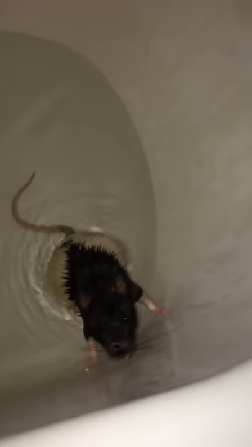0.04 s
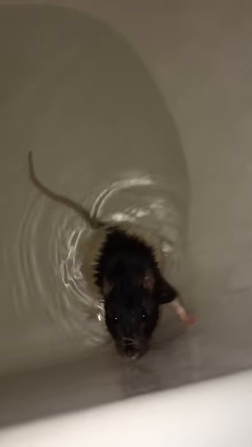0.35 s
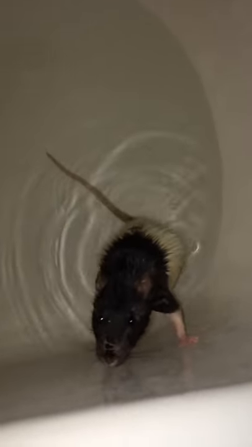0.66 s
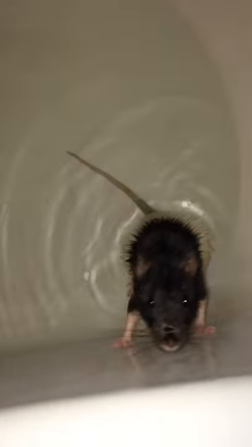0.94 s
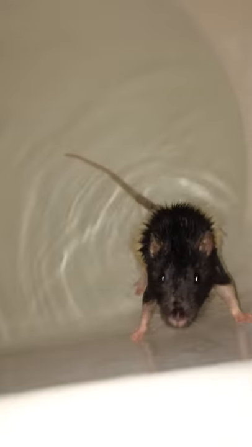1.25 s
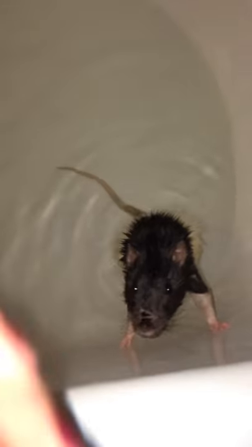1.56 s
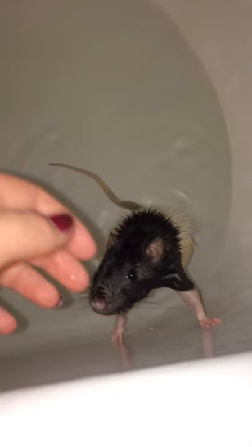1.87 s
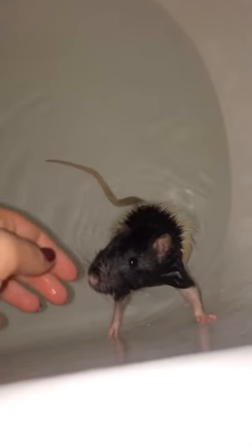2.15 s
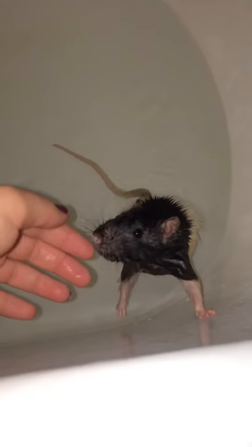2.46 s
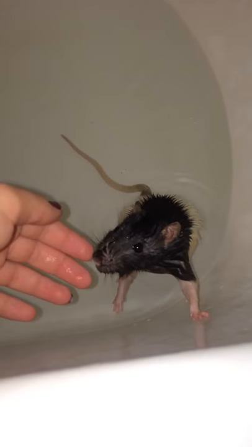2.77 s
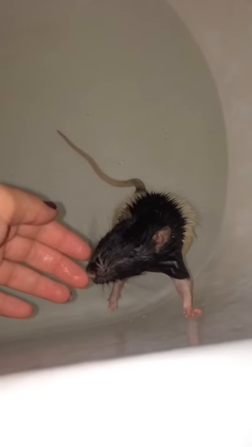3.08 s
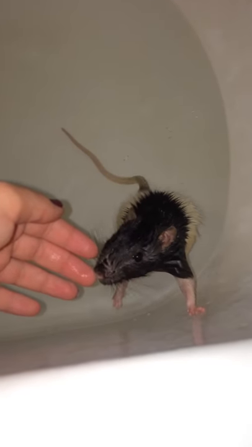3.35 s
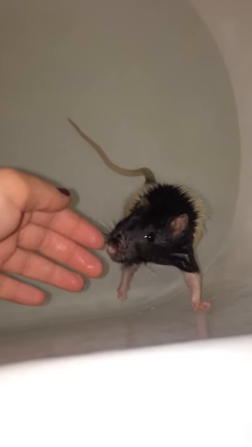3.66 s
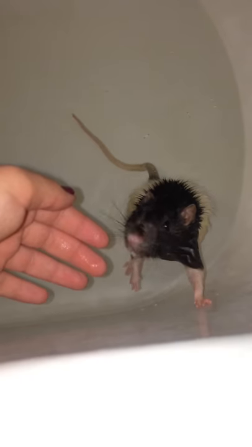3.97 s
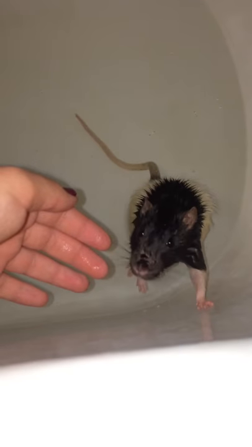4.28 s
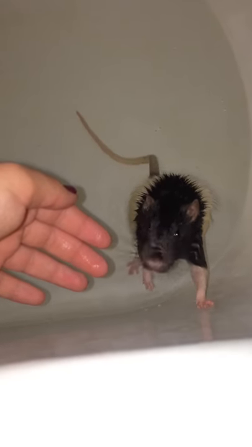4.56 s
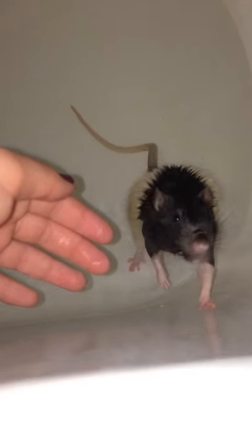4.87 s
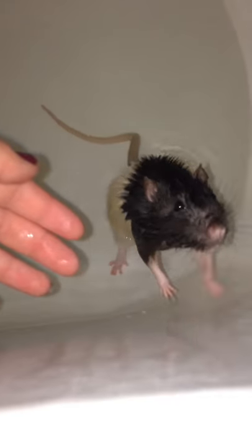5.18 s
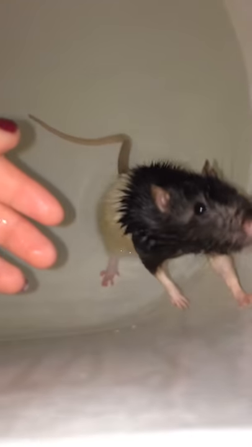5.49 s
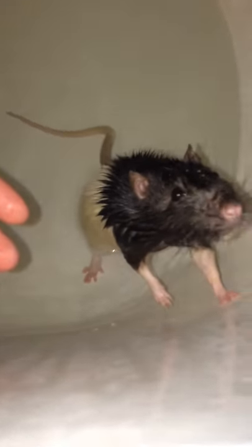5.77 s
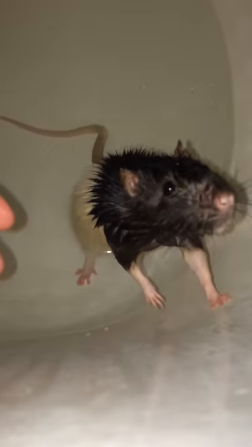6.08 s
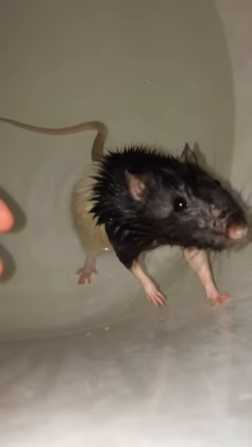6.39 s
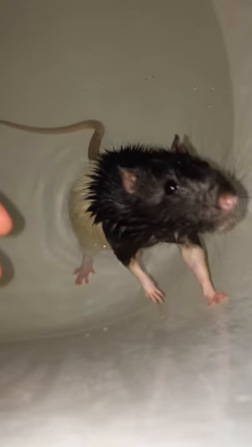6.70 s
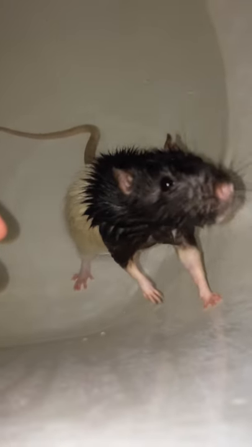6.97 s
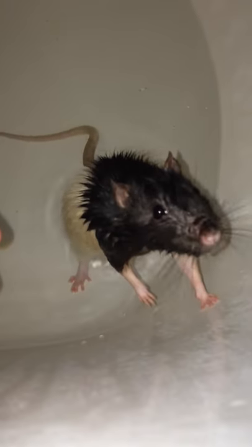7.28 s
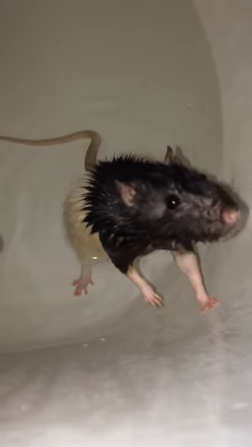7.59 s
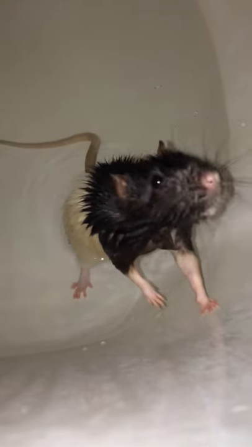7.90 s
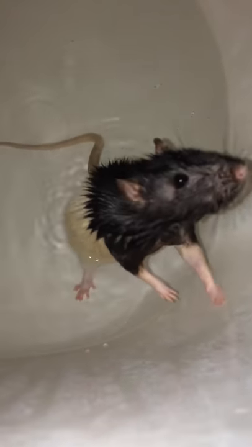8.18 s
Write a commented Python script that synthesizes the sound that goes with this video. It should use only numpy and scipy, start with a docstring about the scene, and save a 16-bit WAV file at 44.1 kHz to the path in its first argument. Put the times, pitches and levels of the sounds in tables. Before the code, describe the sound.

A small animal wades through shallow bath water, with light sloshes, drips and plops, and one bigger splash near the end.

```python
"""Small drips and light sloshing, close by: a rat wades in a shallow bath, then lunges once
and later makes one big splash. Its legs trap air that plops and gurgles, drops fall from its fur,
and fine spray crackles on the surface. The stirred water booms softly in the tub;
the tub walls and a small bathroom echo."""
import sys
import numpy as np
from scipy import signal
from scipy.fft import rfft, irfft, next_fast_len
from scipy.io import wavfile

SR = 44100
rng = np.random.default_rng(int(sys.argv[2]) if len(sys.argv) > 2 else 0)


def transcribe(u):
    """Save the signal u as a 16-bit wav file named by the first command-line argument.

    u: samples, shape (n,) or (channels, n), limited to [-1, 1]; the rate is SR.
    q: integer samples, one column per channel.
    """
    v = np.clip(np.atleast_2d(u).T, -1, 1)
    q = np.round(v * 32767).astype(np.int16)
    wavfile.write(sys.argv[1], SR, q)


N = 363384

# Spectra of still air, churn and spray. Each row: frequency in Hz, relative density in dB.
ROOM_TONE_SPECTRUM = [(15, -38.5), (30, -4.5), (85, -31.5), (200, -8), (500, -6.5), (1000, -30),
                      (1600, -50), (4000, -16), (15000, -27.5)]
CHURN_SPECTRUM = [(250, -18), (600, -12), (1000, -0.5), (1550, 4), (2200, 0.5), (3400, -3), (5000, -6),
                  (9000, -24)]
SPRAY_SPECTRUM = [(1500, -11), (3500, -8), (5000, -8.5), (7000, -7), (9000, -4.5), (12000, -4.5),
                  (15500, -1)]
# Bathroom reverberation. Each row: frequency in Hz, T60 in seconds.
ROOM_DECAY = [(150, 0.29), (600, 0.26), (1500, 0.22), (5000, 0.28), (14000, 0.27)]
# Resonances of the tub's shell, the hollow of air above the water, and the basin.
# Each row: frequency in Hz, bandwidth in Hz, relative gain in dB.
SHELL_MODES = [(91, 31, -0.5), (114, 25, -18.5), (142.6, 7.4, -2), (171, 7.6, -9)]
HOLLOW_MODES = [(288, 3.6, 5.4), (340.8, 16, 12), (408, 25, 3.7)]
BASIN_MODES = [(483, 2.8, 3.5), (532.3, 35.5, 10.5), (587, 10.6, 8.5), (658, 16, 4), (692, 53, 0.5)]
# Weight shifting against the tub. Each row: start in seconds, length in seconds, boom level in dB.
SHOVES = [(0.92, .2, -62), (1.46, 0.012, -61), (1.63, 0.15, -50.5), (1.79, 0.04, -43), (2.15, 0.4, -63),
          (2.55, 0.49, -62.5), (4.17, 0.79, -57.5), (4.93, 0.11, -61), (5.74, .1, -61),
          (6.24, 0.079, -44.5), (6.57, 0.52, -46), (7.1, 0.032, -52.5), (7.61, 0.26, -49.5),
          (7.95, .28, -61.5)]
# Moves of a leg or the body through the water.
# Each row: start in seconds, length in seconds, then slosh, hollow, churn and spray levels in dB.
STROKES = [(0.023, 0.017, -73, -65, -66, -52), (0.466, 0.031, -58.5, -60, -59.5, -48.5),
           (0.796, 0.047, -87, -77, -61.5, -55), (0.906, 0.035, -57.5, -58, -60, -63),
           (1.022, 0.11, -58, -51, -52, -48), (1.274, 0.042, -58.5, -55, -51, -49.5),
           (1.405, 0.087, -50, -47.5, -61.5, -59.5), (1.655, .14, -64, -61, -59.5, -57.5),
           (1.816, 0.06, -47, -45, -52.5, -72), (2.268, 0.083, -68, -70, -55, -54.5),
           (2.511, 0.054, -57, -52, -51.5, -62.5), (2.662, 0.033, -70.5, -66, -55.5, -61),
           (2.836, 0.094, -63.5, -70, -62, -68), (3.485, .005, -60, -58.5, -66, -75),
           (3.576, 0.21, -75, -79, -65.5, -62.5), (4.127, 0.24, -51.5, -56, -46.5, -49.5),
           (4.349, .07, -56, -56.5, -42.5, -49.5), (4.509, .1, -41.5, -52.5, -47, -52.5),
           (4.917, 0.12, -50.5, -49.5, -57, -59), (5.161, 0.25, -62.5, -64, -61.5, -59.5),
           (5.728, 0.038, -60.5, -58, -58.5, -66.5), (6.198, 0.072, -42, -48.5, -49, -101),
           (6.426, 0.14, -60, -57, -60, -58), (6.531, 0.15, -29.5, -36.5, -40.5, -69),
           (6.584, 0.01, -38, -45, -37.5, -43), (6.732, 0.076, -67, -73, -50, -62.5),
           (6.963, 0.13, -68, -69, -51, -55), (7.061, 0.16, -56.5, -65, -50.5, -51),
           (7.327, 0.31, -66, -63.5, -52.5, -55.5), (7.708, 0.1, -54, -52.5, -55.5, -75),
           (7.922, .03, -56.5, -55.5, -77, -89)]
# Drops and paws hitting the surface. Each row: start in seconds, relative level in dB, centre in Hz.
SLAPS = [(0.395, -39.5, 3880), (0.491, -37, 5030), (0.784, -39.5, 5000), (0.995, -38.5, 7760),
         (1.009, -37.5, 13200), (1.127, -33.5, 8700), (1.228, -41.5, 5540), (1.281, -33.5, 4400),
         (1.407, -36, 3470), (1.875, -43, 8000), (2.258, -55.5, 6300), (2.33, -49, 2370),
         (2.468, -48, 3970), (3.463, -48, 900), (3.714, -39.5, 2000), (4.097, -33.5, 3900),
         (4.142, -33, 1480), (4.264, -34.5, 4330), (4.323, -31, 690), (4.421, -28.5, 3060),
         (4.469, -28.5, 3160), (4.918, -38, 1310), (5.277, -47.5, 3600), (5.6277, -42.5, 6260),
         (5.865, -58, 7700), (5.978, -51, 4100), (6.081, -44.5, 4340), (6.081, -50.5, 12700),
         (6.1647, -37, 3150), (6.164, -32.5, 970), (6.983, -41.5, 4660), (7.065, -36.5, 4100),
         (7.088, -34, 4270), (7.177, -38, 4300), (7.344, -41, 1800), (7.6732, -40.5, 1050),
         (7.788, -43, 970)]
# Small bubbles left by drops from the fur. Each row: start in seconds, pitch in Hz, peak in dB.
DRIPS = [(0.0, 1270, -48), (0.0278, 913, -40.5), (0.059, 1864, -46), (0.219, 4330, -48.5),
         (0.3946, 3580, -33.5), (0.4952, 1704, -46), (0.647, 2220, -55.5), (1.0759, 1323, -36.5),
         (1.2389, 1874, -48.5), (1.4256, 3560, -43), (2.059, 2865, -47.5), (2.2761, 2030, -46.5),
         (2.3293, 1815, -38), (2.5628, 1480, -48), (2.8308, 1600, -50), (2.931, 1540, -48.5),
         (3.0882, 1240, -47.5), (3.205, 1860, -53), (3.283, 1350, -46.5), (3.338, 1504, -52.5),
         (3.714, 1440, -39.5), (3.83, 3960, -41.5), (3.8753, 1470, -42.5), (3.9883, 1495, -50.5),
         (4.0663, 1450, -40.5), (4.266, 1640, -33.5), (4.4757, 2990, -26), (4.76, 3770, -47.5),
         (4.863, 3130, -49), (5.018, 1280, -48), (5.04, 1474, -43.5), (5.129, 1547, -48.5),
         (5.1862, 9000, -38), (5.3248, 1215, -49), (5.4385, 1825, -51), (5.6796, 1300, -45.5),
         (5.79, 1590, -48), (6.448, 1673, -46), (6.9619, 1670, -32.5), (7.0233, 1572, -34),
         (7.413, 3220, -41.5), (7.4965, 1880, -43), (7.845, 3220, -52), (7.927, 2526, -53),
         (8.128, 4080, -56), (8.18, 1515, -54)]
# Big air pockets trapped by the legs. Each row: start in seconds, pitch in Hz, peak in dB.
AIR_POCKETS = [(1.3354, 540, -40.5), (1.4542, 510, -46.5), (1.8025, 496, -36.5), (1.8383, 270, -36.5),
               (2.094, 1190, -34), (2.155, 950, -44), (2.5251, 508, -39.5), (3.4641, 580, -44),
               (4.1473, 870, -38), (4.3247, 575, -31), (4.337, 495, -31.5), (4.471, 756, -27),
               (4.504, 767, -25.5), (4.578, 895, -28.5), (4.846, 1220, -38), (6.166, 538, -31),
               (6.244, 874, -34), (6.278, 463, -33), (6.3476, 930, -40), (6.509, 1080, -26),
               (6.533, 486, -23.5), (6.5436, 545, -16.5), (6.545, 937, -21), (6.56, 331, -27.5),
               (6.5967, 1226, -28), (6.6512, 603, -18.5), (6.6692, 867, -17.5), (6.8622, 887, -37.5),
               (6.9617, 920, -36), (7.0852, 1060, -32), (7.4489, 950, -35), (7.7915, 892, -32),
               (8.1212, 973, -44)]

TOP_HZ = 15550


def amp(db):
    return 10 ** (np.asarray(db) / 20)


def unit_rms(x):
    return x / np.sqrt(np.mean(x ** 2) + 1e-20)


def log_interp(points, hz):
    point_hz, values = np.transpose(points)
    return np.interp(np.log(hz + 1), np.log(point_hz + 1), values)


def filtered(x, response):
    size = next_fast_len(len(x) + SR // 2)
    return irfft(rfft(x, size) * response(np.fft.rfftfreq(size, 1 / SR)), size)[:len(x)]


def coloured(x, spectrum):
    return unit_rms(filtered(x, lambda hz: amp(log_interp(spectrum, hz))))


def add(track, start_s, sound):
    start = int(np.clip(round(start_s * SR), 0, N - 1))
    track[start:start + len(sound)] += sound[:N - start]


def ringing(x, modes):
    """x through a bank of resonances, which ring on after it stops."""
    return filtered(x, lambda hz: sum(amp(db) * 1j * hz * width / (centre**2 - hz**2 + 1j * hz * width)
                                      for centre, width, db in modes))


def driven(x, level_db, modes):
    """Resonances driven by x, their output following level_db."""
    return ringing(amp(level_db) * x, modes) / ringing(x, modes).std()


def gesture_db(rows, attack_s, fall_db_per_s, rest_db, sag_db_per_s=30):
    """Moves over a resting level: each swells 20 dB per attack_s, sags while held, then falls."""
    t = np.arange(0, N, 32) / SR
    power = amp(rest_db) ** 2
    for start_s, length_s, db in rows:
        age_s = t - start_s
        swell_db = 20 * np.minimum(age_s, 0) / attack_s
        sag_db = sag_db_per_s * np.clip(age_s, 0, length_s)
        fall_db = fall_db_per_s * np.maximum(age_s - length_s, 0)
        power = power + amp(db + swell_db - sag_db - fall_db) ** 2
    return np.interp(np.arange(N) / SR, t, 10 * np.log10(power))


def bubble(age_cycles, life_cycles, rise, attack_cycles):
    """A bubble swells, dies by 60 dB over its life and rises in pitch as it surfaces."""
    phase = 2 * np.pi * age_cycles * (1 + rise * age_cycles / life_cycles / 2)
    swell = (1 - np.exp(-age_cycles / attack_cycles)) ** 2
    return np.sin(phase) * amp(-60 * age_cycles / life_cycles) * swell


def swarm(count, lo_hz, hi_hz, life_cycles, spread_db, samples):
    """Bubbles at random times, pitches and strengths, at rms 1."""
    when, pitch, strength = rng.random((count, 3)).T[:, :, None]
    age_cycles = lo_hz * (hi_hz / lo_hz) ** pitch * np.arange(samples) / SR
    gains = amp(spread_db * np.minimum(-np.log(strength), 4))
    grains = gains * bubble(age_cycles, life_cycles, rise=0.02, attack_cycles=0.11)
    indices = (when * N).astype(int) + np.arange(samples)
    return unit_rms(np.bincount(indices.ravel(), grains.ravel(), N + samples)[:N])


def room_tone():
    """Faint hum and hiss of the bathroom's still air."""
    return amp(-71.5) * coloured(rng.standard_normal(N), ROOM_TONE_SPECTRUM)


def echoes(count, walls_db, room_db, walls_t60_s):
    """One impulse response per spot in the bath: direct sound, quick tub walls, room tail."""
    hz, t, spectra = signal.stft(rng.standard_normal((count, SR // 3)), SR, nperseg=256)
    decay = amp(-60 * t / log_interp(ROOM_DECAY, hz)[:, None])
    tail = signal.istft(spectra * decay, SR, nperseg=256)[1]
    t = np.arange(tail.shape[1]) / SR
    tail = tail * np.clip(t / 0.0082, 0, 1)
    walls = rng.standard_normal(tail.shape) * amp(-60 * t / walls_t60_s) * (t > 0.002)
    paths = amp(room_db) * tail / np.linalg.norm(tail[0])
    paths += amp(walls_db) * walls / np.linalg.norm(walls[0])
    paths[:, 0] += 1
    return paths


def in_tub(x, walls_db, room_db, spots):
    """A running sound in the tub, its echoes changing as the water moves."""
    out = np.zeros(N)
    paths = echoes(spots, walls_db, room_db, walls_t60_s=0.11)
    for piece, path in zip(np.array_split(np.arange(N), spots), paths):
        add(out, piece[0] / SR, signal.fftconvolve(x[piece], path / np.linalg.norm(path)))
    return out


def tub_boom(hollow_db):
    """Paws and heaving water drive the lowest modes of the shell and of the air in the tub."""
    shove_db = gesture_db(SHOVES, attack_s=0.1, fall_db_per_s=108, rest_db=-71.5)
    wave_db = hollow_db - 12  # a stroke's push on the shell
    boom_db = 20 * np.log10(np.hypot(amp(shove_db), amp(wave_db)))
    push = coloured(rng.standard_normal(N), [(20, -14), (60, 0), (200, -0.5), (400, -40)])
    heave = coloured(rng.standard_normal(N), [(100, -17.5), (250, 6.5), (400, -8.5), (800, -3.5)])
    return driven(push, boom_db, SHELL_MODES) + driven(heave, hollow_db, HOLLOW_MODES)


def stroke_levels_db():
    """Each stroke drives slosh, hollow, churn and spray; each of these settles at its own rate."""
    start_s, length_s, *levels_db = np.transpose(STROKES)
    falls_db_per_s = 183, 162, 143, 135
    rests_db = -77, -80, -71, -70  # lapping and wet fur between strokes
    return [gesture_db(zip(start_s, length_s, db), attack_s=0.056, fall_db_per_s=fall, rest_db=rest)
            for db, fall, rest in zip(levels_db, falls_db_per_s, rests_db)]


def stirred_water(slosh_db, churn_db, spray_db):
    """Big bubbles slosh, smaller ones churn, the finest burst as spray; wet fur crackles and drips."""
    big = swarm(count=1700, lo_hz=343, hi_hz=980, life_cycles=5.2, spread_db=5, samples=900)
    slosh = driven(big, slosh_db, BASIN_MODES)
    medium = swarm(count=3600, lo_hz=781, hi_hz=4750, life_cycles=31, spread_db=4.5, samples=700)
    churn = amp(churn_db) * coloured(medium, CHURN_SPECTRUM)
    tiny = swarm(count=2000, lo_hz=3000, hi_hz=13500, life_cycles=32, spread_db=5, samples=500)
    clicks = swarm(count=1800, lo_hz=3500, hi_hz=15000, life_cycles=5, spread_db=5, samples=60)
    spray = amp(spray_db) * coloured(tiny + 0.6 * clicks, SPRAY_SPECTRUM)
    drops = swarm(count=240, lo_hz=1300, hi_hz=7000, life_cycles=36, spread_db=1.8, samples=900)
    trickle = amp(-70.5) * drops
    near_spray = in_tub(spray, walls_db=6, room_db=-1, spots=60)
    return slosh + near_spray + in_tub(churn + trickle, walls_db=15, room_db=10, spots=28)


def slaps():
    """A drop or paw breaks the surface with a short crack; five droplets land just after."""
    out, t = np.zeros(N), np.arange(SR // 20) / SR
    attack_s, t60_s = 0.0005, 0.014
    envelope = amp(-60 * t / t60_s) * (1 - np.exp(-t / attack_s))
    paths = echoes(len(SLAPS), walls_db=0.5, room_db=-1.16, walls_t60_s=0.16)
    for (start_s, db, hz), path in zip(SLAPS, paths):
        spectrum = [(hz / 5, -22), (hz / 1.47, -11), (hz, 0),
                    (hz * 1.42, -12), (hz * 3, -24), (hz * 7, -40)]
        crack = coloured(rng.standard_normal(len(t)), spectrum) * envelope
        slap = signal.fftconvolve(crack, path)
        add(out, start_s, amp(db + 4.5) * slap / np.abs(slap).max())
        for delay, pitch, strength in rng.standard_normal((5, 3)):
            lag_s = 0.037 * abs(delay)
            droplet_hz = min(hz * 2 ** (0.29 * pitch), TOP_HZ)
            gain_db = db - 20.5 + 2 * strength - 120 * lag_s
            droplet = bubble(droplet_hz * t, life_cycles=16, rise=0.067, attack_cycles=3.8)
            add(out, start_s + lag_s, amp(gain_db) * droplet)
    return out


def plops(rows, mid_life_cycles, halvings_per_10_db, swell_share, rise, walls_db, room_db, shed_db):
    """Each bubble rings, sheds two smaller ones and echoes; the low ones set the basin ringing."""
    out, t = np.zeros(N), np.arange(SR // 8) / SR
    paths = echoes(len(rows), walls_db, room_db, walls_t60_s=0.065)
    mid_db = np.mean([db for _, _, db in rows])
    max_shed_lag_s = 0.035
    for (start_s, hz, db), path in zip(rows, paths):
        # A harder blow leaves rougher water, so a shorter life.
        life_cycles = mid_life_cycles * 2 ** (halvings_per_10_db * (mid_db - db) / 10)
        attack_cycles = swell_share * life_cycles
        bubbles = bubble(hz * t, life_cycles, rise, attack_cycles)
        for delay, pitch in rng.random((2, 2)):
            age_cycles = hz * (1 + 0.323 * pitch) * np.maximum(t - max_shed_lag_s * delay, 0)
            bubbles += amp(shed_db) * bubble(age_cycles, 0.76 * life_cycles, rise, 0.7 * attack_cycles)
        plop = signal.fftconvolve(bubbles, path)
        add(out, start_s, amp(db) * plop / np.abs(plop).max())
    return out + amp(-26.5) * ringing(out, BASIN_MODES)


def fur_drips():
    """Drops fall from the fur, each leaving a small ringing bubble."""
    return plops(DRIPS, mid_life_cycles=76, halvings_per_10_db=0.62, swell_share=0.038, rise=0.025,
                 walls_db=-2.5, room_db=1, shed_db=-13.5)


def air_pockets():
    """The legs trap big pockets of air, which ring low for a few cycles."""
    return plops(AIR_POCKETS, mid_life_cycles=18.2, halvings_per_10_db=0.13, swell_share=0.077,
                 rise=0.04, walls_db=-1, room_db=0.5, shed_db=-11.5)


def scene():
    """Still air, water and tub, in mono."""
    slosh_db, hollow_db, churn_db, spray_db = stroke_levels_db()
    air = room_tone()
    water = air_pockets() + fur_drips() + slaps() + stirred_water(slosh_db, churn_db, spray_db)
    return (air + water + tub_boom(hollow_db))[None]


def record(dry):
    """Brick-wall low-pass at TOP_HZ."""
    return filtered(dry[0], lambda hz: hz < TOP_HZ)[None]


dry = scene()
out = record(dry)
transcribe(out)
```